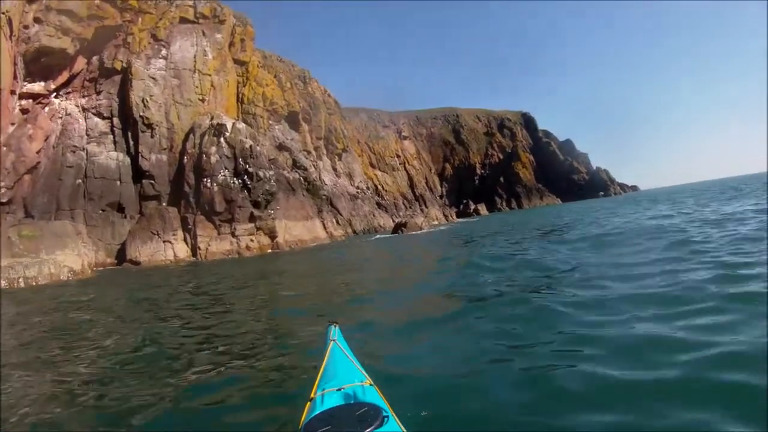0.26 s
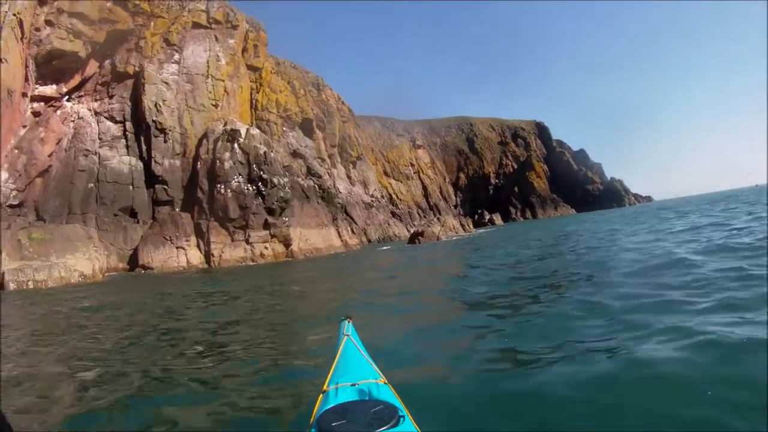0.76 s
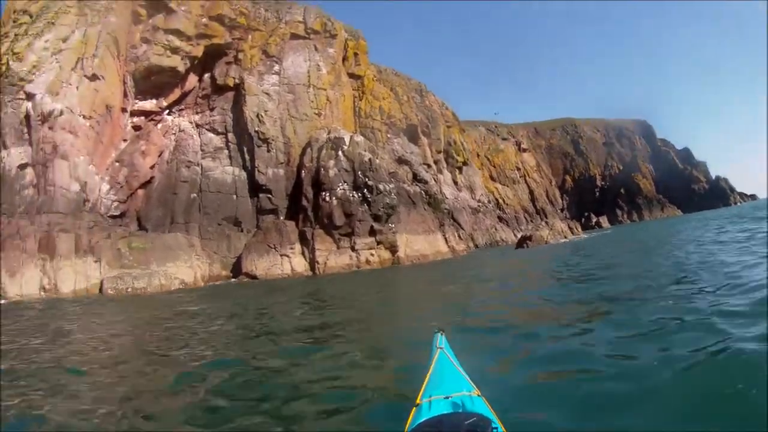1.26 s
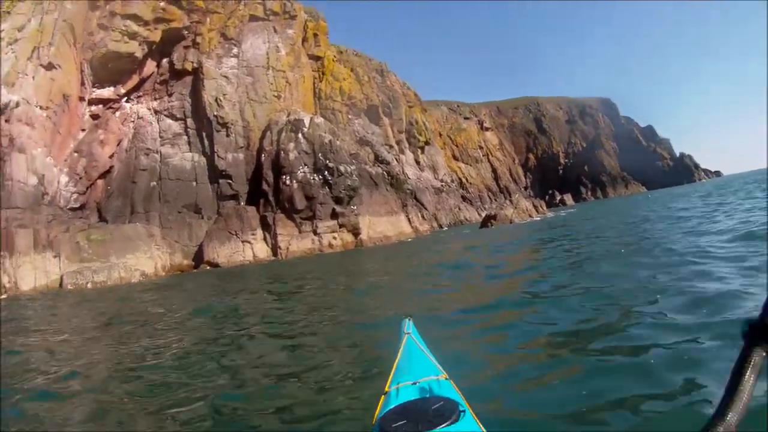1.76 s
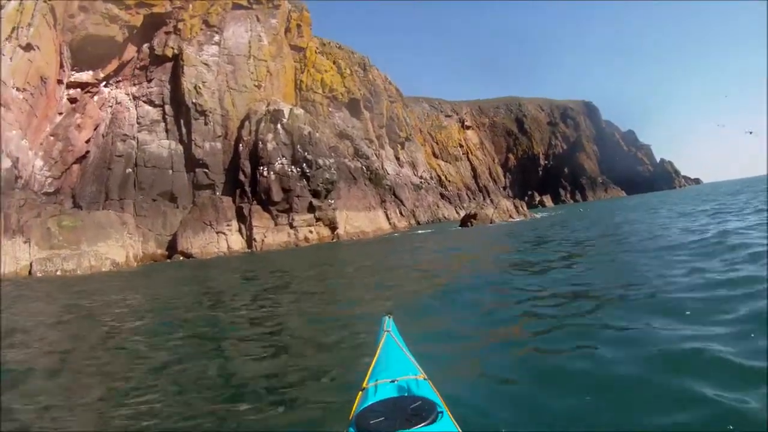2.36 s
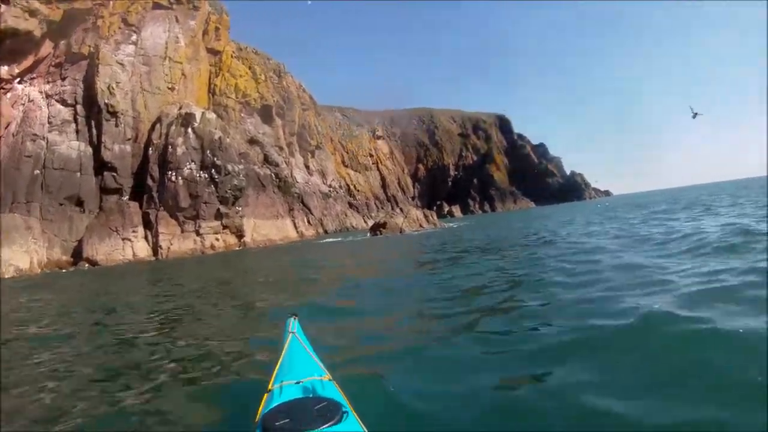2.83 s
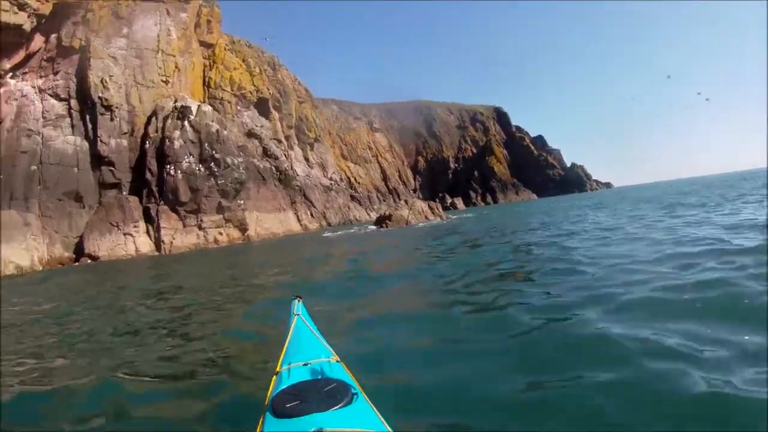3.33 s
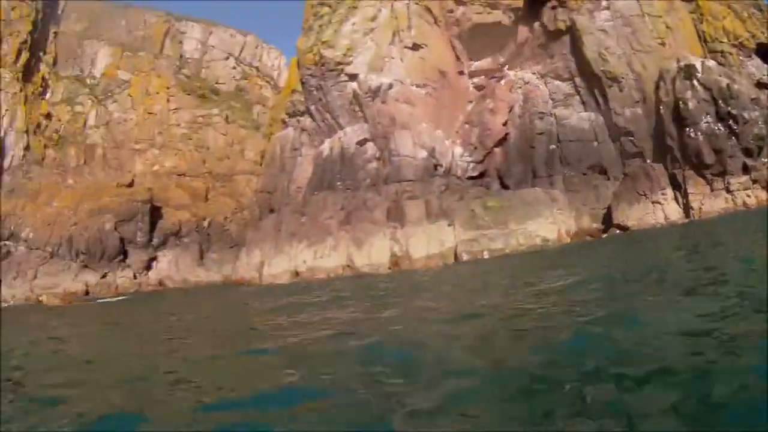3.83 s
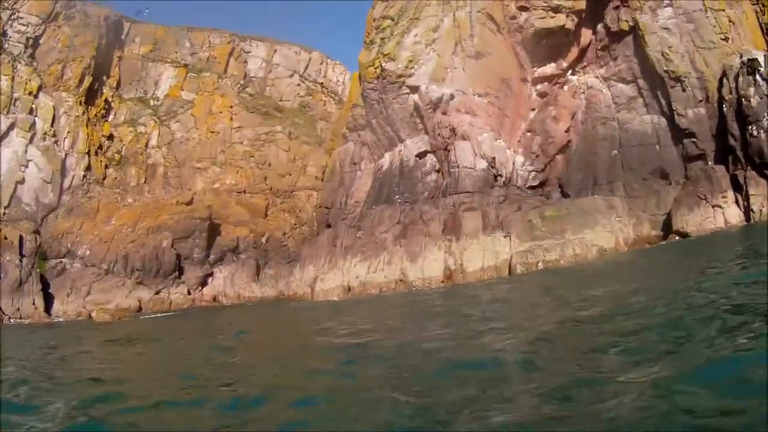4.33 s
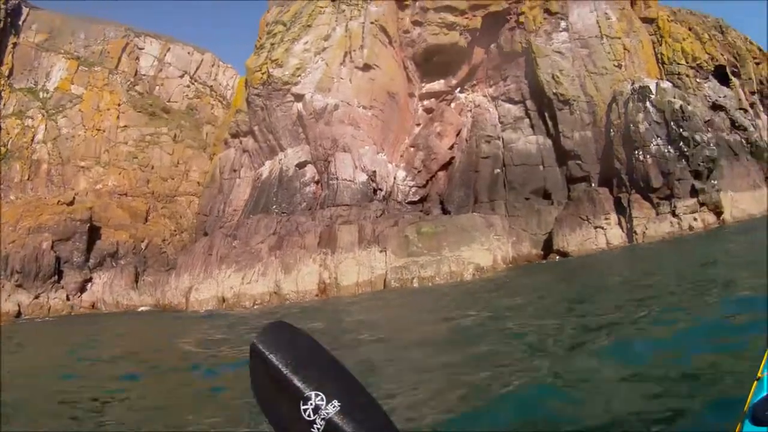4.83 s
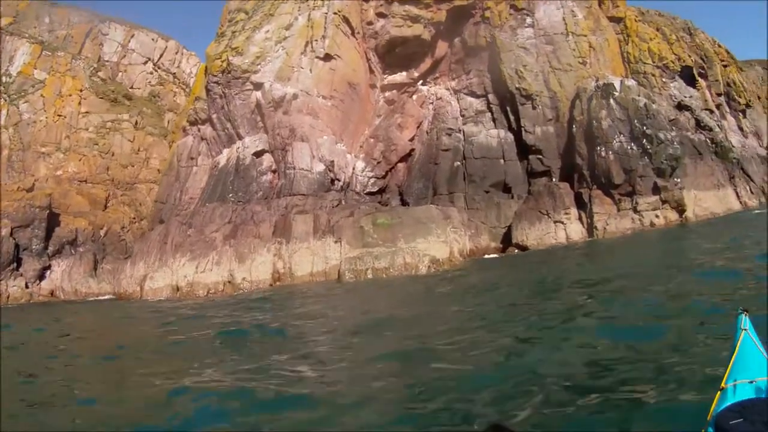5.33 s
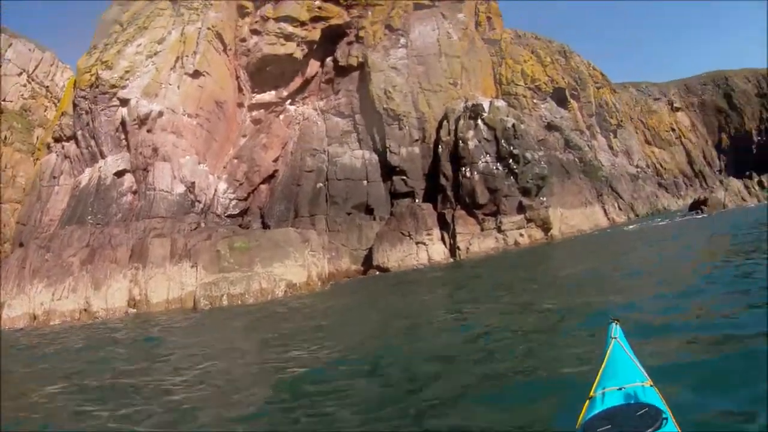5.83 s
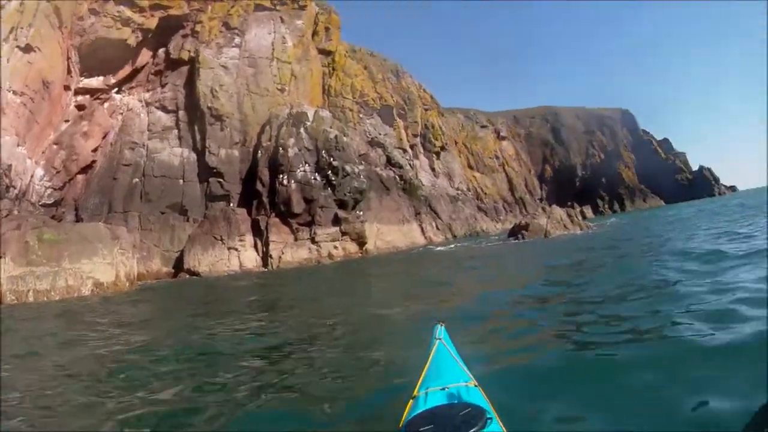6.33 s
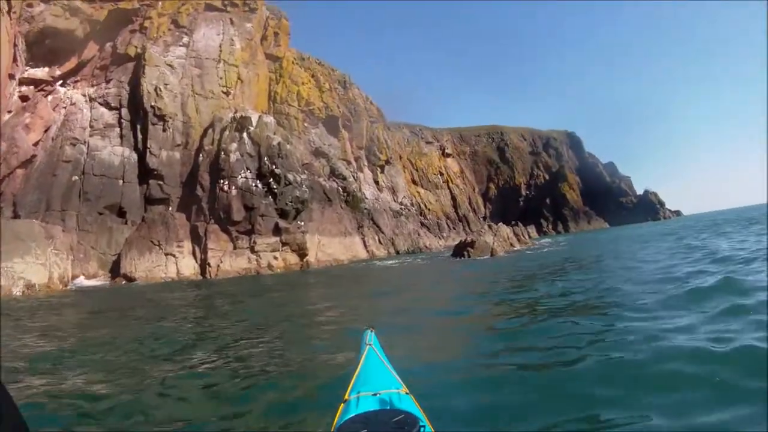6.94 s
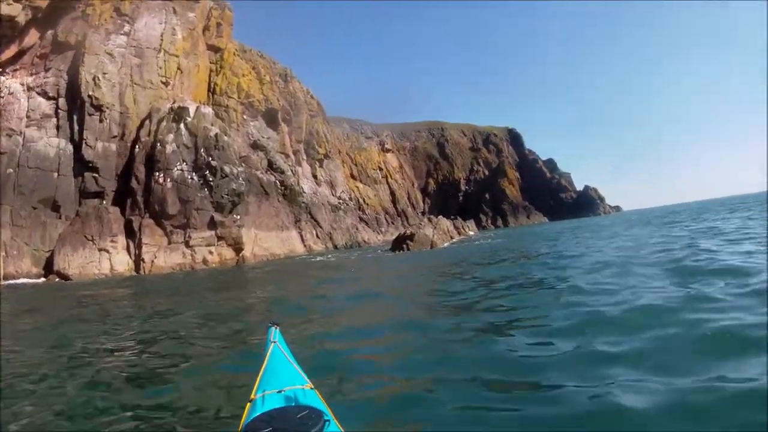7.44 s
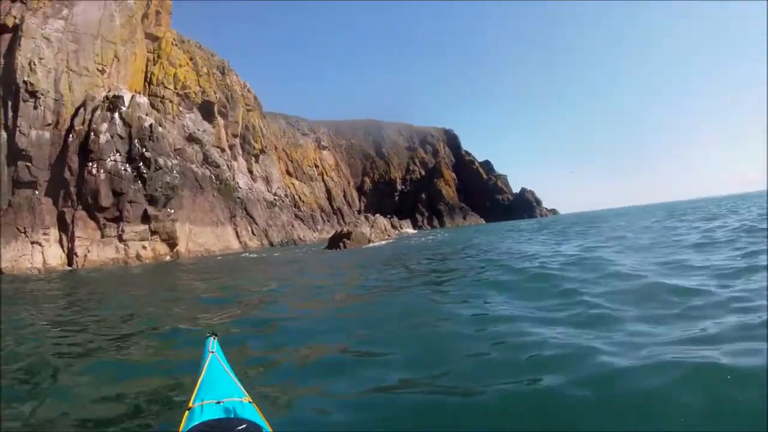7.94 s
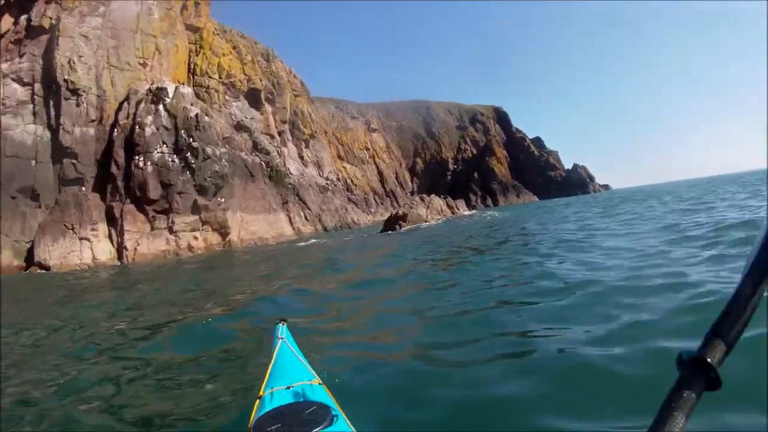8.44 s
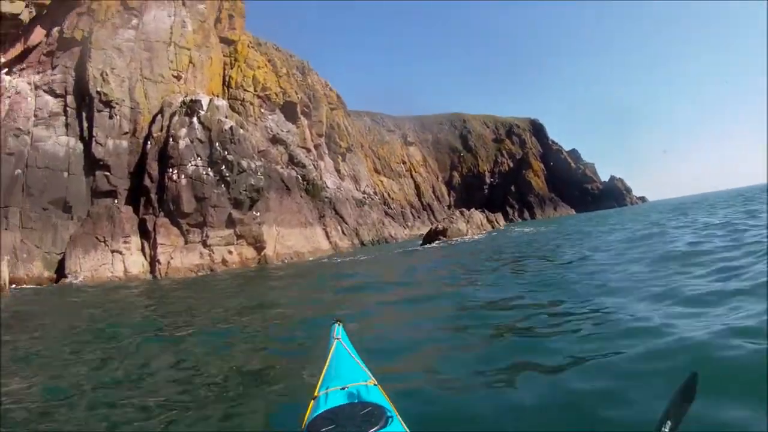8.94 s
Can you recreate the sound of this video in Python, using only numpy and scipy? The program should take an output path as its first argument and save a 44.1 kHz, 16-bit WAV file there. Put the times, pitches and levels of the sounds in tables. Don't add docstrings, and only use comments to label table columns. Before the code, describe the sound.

A steady, muted wash of swell with fine foam fizz lasts the whole nine seconds or so, close to the water beneath rocky cliffs. A low wind bump opens it, with scattered drips and tiny gurgles. At about 0.8 seconds a gull begins faintly; from 1.8 it repeats a fast three-note call roughly every 0.4 seconds: rising lead-in, drooping high note, fuller lower note. It grows louder and brighter by 4 to 5 seconds and continues, slightly slurred after 7.4, to about 9. Shorter, higher cries answer from afar, densest from 3 to 7, with a faint colony behind and short rock echoes. Soft splashes come near 1.8, 3.7 and 4.5, a sharp drop at 4.5, stronger splashes around 5.9 to 6.5, then a crisp burst of splashes and ticks at 8.4 to 8.7. Low wind puffs nudge the housed microphone near 1.4, 2.2, 4.9 and 7.3.

```python
import sys
import numpy as np
from scipy import signal
from scipy.fft import rfft, irfft, next_fast_len
from scipy.io import wavfile
from scipy.ndimage import uniform_filter1d

SR = 44100
rng = np.random.default_rng(int(sys.argv[2]) if len(sys.argv) > 2 else 0)


def gain_from_db(level_db):
    decades = np.asarray(level_db, float) / 20
    return 10 ** decades


def persist_wave(psi):
    counts = np.round(np.clip(psi, -1, 1) * 32767).astype(np.int16)
    wavfile.write(sys.argv[1], SR, np.atleast_2d(counts).T)


N = 405279


def evened(x):
    return x / np.sqrt(np.mean(x ** 2) + 1e-20)


def curve(table, column):
    rows = np.array(table)
    return np.interp(np.arange(N) / SR, rows[:, 0], rows[:, column])


def coloured(x, points):
    hz, db = np.transpose(points)
    size = next_fast_len(len(x))
    bins = np.fft.rfftfreq(size, 1 / SR)
    gain = gain_from_db(np.interp(np.log(bins + 1), np.log(hz), db))
    return irfft(rfft(x, size) * gain, size)[:len(x)]


def wander(seconds):
    width = max(round(seconds * SR), 1)
    smooth = uniform_filter1d(rng.standard_normal(N), width)
    return evened(uniform_filter1d(smooth, width))


def add(mix, s, sound):
    part = mix[round(s * SR):][:len(sound)]
    part += sound[:len(part)]


def bursts(rows, rest_db):
    t = np.arange(N) / SR
    power = gain_from_db(rest_db) ** 2
    for s, rise, fall, db in rows:
        away = np.where(t < s, (s - t) / rise, (t - s) / fall)
        power = power + gain_from_db(db) ** 2 * np.exp(-away ** 2)
    return np.sqrt(power)


def glides(rows, partials_db, rise_s, fall_s, fade_db, tilt, waver, flutter_db, slur=0, bend=4):
    slurs_from_s, slur_s = 7.4, 0.01377
    out = np.zeros(N)
    tremble, flutter = wander(0.0035), wander(0.0091)
    order = np.arange(1, len(partials_db) + 1)[:, None]
    for s, length, first_hz, last_hz, even, db in rows:
        at = round(s * SR)
        t = np.arange(min(round(length * SR), N - at)) / SR
        u = t / length
        hz = first_hz + (last_hz - first_hz) * (even * u + (1 - even) * u ** bend)
        hz *= 1 + slur * (s > slurs_from_s) * np.exp(-t / slur_s)
        phase = 2 * np.pi * np.cumsum(hz * (1 + waver * tremble[at:at + len(t)])) / SR
        weights = gain_from_db(np.reshape(partials_db, (-1, 1)) + tilt[at] * np.log2(order / 8.8))
        shape = np.minimum(t / rise_s, 1) * np.clip((length - t) / fall_s, 0, 1)
        shape *= gain_from_db(-fade_db * (u - 1.0))
        beats = flutter[(at + np.arange(len(t)) + order * SR) % N]
        partials = weights * gain_from_db(flutter_db * beats) * np.sin(order * phase)
        add(out, s, np.sqrt(2) * gain_from_db(db) * partials.sum(0) * shape)
    return out


# start_s, lead_in_s, length_s, pitch_hz, level_db
SECOND_NOTES = [(0.843, .015, 0.05, 1710, -52), (1.403, 0.048, 0.07, 1695, -53.5),
                (1.83, .026, 0.073, 1680, -53.5), (2.24, 0.021, 0.078, 1643, -49),
                (2.667, 0.026, 0.078, 1655, -50), (3.087, 0.025, 0.08, 1655, -48.5),
                (3.519, 0.024, 0.088, 1663, -44.5), (3.921, 0.028, 0.072, 1668, -47),
                (4.309, 0.033, 0.071, 1650, -44.5), (4.672, 0.029, 0.091, 1664, -44.5),
                (5.06, 0.033, 0.073, 1669, -42), (5.429, 0.034, 0.074, 1657, -43.5),
                (5.834, .02, .096, 1665, -46.5), (6.316, 0.041, 0.093, 1645, -44),
                (6.715, 0.032, 0.071, 1640, -43), (7.137, 0.052, 0.04, 1630, -44),
                (8.442, 0.008, 0.0516, 1677, -44), (9.142, 0.034, 0.14, 1558, -46)]
# start_s, length_s, level_db
ARCHED_NOTES = [
    (7.442, 0.081, -46.5),
    (7.765, 0.077, -47.5),
    (8.088, .066, -45.5),
    (8.75, 0.08, -46.5),
]
# start_s, length_s, pitch_hz, level_db, droop (share of pitch)
THIRD_NOTES = [(1.906, 0.056, 1255, -49.5, 0.067), (2.307, 0.089, 1241, -45, .1),
               (2.777, .078, 1244, -44, .1), (3.164, 0.108, 1246, -43, .08), (3.603, 0.11, 1252, -40, .12),
               (3.994, 0.094, 1255, -40.5, 0.094), (4.375, 0.089, 1264, -36, .11),
               (4.755, 0.094, 1255, -39, .12), (5.127, 0.084, 1257, -38, .11),
               (5.515, 0.082, 1260, -39, .13), (5.917, 0.112, 1258, -39.5, 0.15),
               (6.388, 0.1, 1246, -38.5, 0.14), (6.802, 0.08, 1241, -37.5, 0.16),
               (7.178, .09, 1234, -37, 0.148), (7.512, 0.096, 1234, -36, .15),
               (7.83, 0.097, 1232, -36.5, 0.142), (8.149, 0.092, 1217, -36.5, .13),
               (8.489, 0.085, 1231, -37, 0.12), (8.812, 0.098, 1199, -39, 0.062),
               (8.883, 0.09, 1267, -44, 0.11)]
FIRST_PARTIALS = [-2.5, 0, -2, -4.5, -29, -37]
SECOND_PARTIALS = [-7.5, -3.5, -9, -29, -39, -48]
THIRD_PARTIALS = [-14.5, -12, -5.5, -5, -17.5, -42.5]
# time_s, tilt_db_per_octave
FACING_BOAT = [
    (0, -2),
    (2.3, -2.5),
    (3.3, -1),
    (4, 0.5),
    (5, 0),
    (6.2, -1),
    (7, -0.5),
    (7.6, 0),
    (8.4, 0),
    (9.2, 0),
]


def near_bird():
    lead_from, lead_to, lead_db = .805, .88, -4
    overlap_s = 0.0023
    high_droop = 0.1405
    facing = curve(FACING_BOAT, 1)
    first = [(s - lead, lead + overlap_s, lead_from * hz, lead_to * hz, 1.11, db + lead_db)
             for s, lead, _, hz, db in SECOND_NOTES]
    first += [(s, length, 1368, 1292, -0.23, db) for s, length, db in ARCHED_NOTES]
    second = [(s, length, hz, hz * (1 - high_droop), 0.221, db) for s, _, length, hz, db in SECOND_NOTES]
    third = [(s, length, hz, hz * (1 - droop), 0.1, db) for s, length, hz, db, droop in THIRD_NOTES]
    call = glides(first, FIRST_PARTIALS, 0.0031, 0.0032, 1, facing, 0.0038, 0.92, slur=-0.052)
    call += glides(second, SECOND_PARTIALS, 0.0017, 0.019, 4.5, facing, 0.003, 1.6)
    call += glides(third, THIRD_PARTIALS, 0.0076, 0.014, 0.36, facing, 0.0019, 1.25, slur=0.0506, bend=5.46)
    return call


# start_s, length_s, first_hz, last_hz, level_db
CLIMBING_NOTES = [(2.805, .045, 3950, 4180, -56), (2.78, .1, 1215, 1370, -48.5),
                  (3.305, .053, 3680, 4220, -52.5), (3.791, .075, 3710, 4280, -50),
                  (4.33, .06, 1390, 1510, -48), (4.442, .056, 4030, 4265, -48.5),
                  (4.998, .04, 3990, 4410, -48), (5.247, .073, 3770, 3960, -54.5),
                  (5.456, .112, 1180, 1250, -46.5), (5.722, .035, 3930, 4240, -47),
                  (6.448, .055, 4080, 4260, -48.5), (7.981, .08, 1385, 1430, -43.5),
                  (7.087, .089, 4045, 4215, -51.5), (5.756, .034, 3905, 4065, -50.5),
                  (5.719, .017, 5810, 6110, -51.5), (4.013, .034, 5910, 6840, -57.5),
                  (6.161, .029, 3710, 3860, -49), (2.84, .035, 6100, 6150, -57)]
# start_s, length_s, pitch_hz, level_db
PLUNGING_NOTES = [(2.85, 0.045, 4800, -57), (3.36, 0.053, 4130, -49), (5.997, 0.043, 8950, -62),
                  (6.012, 0.035, 5950, -48), (4.357, 0.069, 1512, -47), (4.506, 0.045, 4280, -45.5),
                  (8.0, .05, 5750, -55), (8.12, .075, 5750, -54), (4.69, .065, 6650, -59),
                  (4.33, .06, 6600, -58), (5.038, 0.071, 4845, -47), (3.35, .06, 4780, -52),
                  (3.606, 0.1, 6760, -54), (3.626, 0.095, 5800, -50), (5.27, 0.066, 5440, -55),
                  (5.455, .07, 6630, -65), (5.756, 0.074, 4800, -49.5), (6.002, .05, 6770, -54),
                  (6.5, .066, 4110, -44.5), (6.663, .1, 1259, -48.5), (7.17, 0.055, 4760, -44),
                  (7.242, 0.072, 5700, -47.5), (7.262, .045, 6400, -51.7), (5.997, 0.051, 8250, -58),
                  (8.868, 0.1, 6970, -56)]
# start_s, length_s, pitch_hz, level_db
SLIDING_NOTES = [(0.102, 0.034, 1450, -48), (0.13, .03, 1660, -52), (1.067, .024, 1660, -48),
                 (0.92, 0.054, 3620, -59), (1.465, 0.021, 2910, -46), (2.699, 0.08, 1590, -48.5),
                 (2.72, .05, 3080, -55), (2.887, .028, 3950, -52), (3.12, .045, 6500, -58),
                 (2.914, .053, 5320, -52), (3.424, .057, 5240, -53), (3.86, 0.051, 4150, -52.1),
                 (5.485, 0.062, 5950, -52), (6.23, 0.07, 5500, -49), (6.235, 0.082, 3624, -39),
                 (3.406, .022, 3620, -52), (8.412, 0.035, 2850, -47), (8.89, 0.067, 5130, -48),
                 (8.9, .055, 3500, -51), (8.9, .05, 8700, -68), (7.534, 0.052, 1436, -53),
                 (0.154, .017, 1130, -52), (5.475, .03, 5300, -55), (3.573, 0.038, 6300, -56),
                 (3.679, 0.037, 1600, -48), (6.736, 0.054, 6460, -52), (8.144, 0.047, 6350, -54),
                 (8.564, 0.032, 5200, -46), (8.874, 0.09, 1743, -45), (8.916, 0.07, 5770, -47)]


def answering_birds():
    plunge, slide_per_s = .12, 1.1
    rows = [(s, length, hz, last_hz, 1.5, db) for s, length, hz, last_hz, db in CLIMBING_NOTES]
    rows += [(s, length, hz, hz * (1 - plunge), 0.223, db) for s, length, hz, db in PLUNGING_NOTES]
    rows += [(s, length, hz, hz * (1 - slide_per_s * length), 1.5, db) for s, length, hz, db in SLIDING_NOTES]
    return glides(rows, [.5], .008, .012, 0, np.zeros(N), .003, 2.6)


def colony():
    draw = rng.random((110, 4))
    start_s = draw[:, 0] * (N / SR - .2)
    length_s = 0.0424 + 0.0636 * draw[:, 2]
    hz = 1150 + 650 * draw[:, 1]
    level_db = -60 - 8 * draw[:, 3]
    rows = np.array([start_s, length_s, hz, .9 * hz, 0.317 + 0 * hz, level_db])
    return glides(rows.T, [0.0, -5.5, -22, -19], 0.025, 0.021, 0, np.zeros(N), 0.0068, 2.4)


# delay_s, level_db
ROCK_FACES = [
    (0.109, -19.5),
    (0.145, -18.5),
    (.29, -17.5),
]


def cliff(x):
    t = np.arange(SR) / SR
    taps = rng.choice([-1., 1.], SR) * (rng.random(SR) < 1500 / SR)
    tail = taps * (t > .03) * gain_from_db(-60 * t / 1.2)
    echo = gain_from_db(-11) * evened(tail) / np.sqrt(SR)
    for delay, db in ROCK_FACES:
        smear = taps * np.exp(-((t - delay) / 0.0058) ** 2)
        echo += gain_from_db(db) * evened(smear) / np.sqrt(SR)
    return signal.oaconvolve(x, echo)[:N]


# peak_s, rise_s, fall_s, level_db
PADDLE_SPLASHES = [(1.37, 0.04, 0.23, -54), (1.75, 0.045, 0.066, -46), (2.23, .02, 0.09, -51),
                   (3.65, 0.056, 0.065, -48.5), (4.45, 0.095, .05, -49), (5.93, 0.034, 0.091, -39),
                   (6.17, 0.028, 0.046, -44.5), (6.42, 0.23, 0.19, -46), (7.25, 0.068, 0.11, -46.5),
                   (8.415, 0.0094, 0.08, -41.5), (8.52, 0.026, 0.084, -41.5), (8.68, 0.017, 0.081, -41.5),
                   (9.1, 0.2, 0.12, -48)]
# freq_hz, level_db
HOUSING_TONE = [(300, -22), (1000, -1.5), (4000, -0.5), (6200, 3), (7500, -6), (10000, -13.5),
                (15000, -24.5)]


def spray():
    t, out, clumps = np.arange(300) / SR, np.zeros(N), wander(0.0089)
    size = gain_from_db(3.8 * np.minimum(rng.exponential(1, N), 4) + 3 * np.clip(clumps, -2, 2))
    size *= rng.random(N) < 2600 / SR
    kind = rng.integers(0, 24, N)
    for k, hz in enumerate(np.geomspace(700, 14500, 24)):
        ring = np.sin(2 * np.pi * hz * t * (1 + 0.0436 * hz * t))
        grain = ring * np.exp(-t * hz / 3.7) * np.sqrt(hz)
        out += signal.oaconvolve(size * (kind == k), grain)[:N]
    sheet = rng.standard_normal(N) * gain_from_db(2.7 * clumps)
    ticks = evened(size * rng.choice([-1., 1.], N) * (kind < 5))
    out += 0.66 * ticks * np.std(out)
    wet = coloured(evened(out) + .45 * sheet, HOUSING_TONE)
    wet = coloured(wet, [(500, 2.5), (2000, 5.5), (6000, 3.0), (14000, 0.5)])
    return bursts(PADDLE_SPLASHES, -56.0) * evened(wet)


# start_s, peak_db,
# pitch_hz
PADDLE_DROPS = [(0.2428, -37, 6430), (0.406, -35.5, 5530), (0.8067, -32.5, 5930), (1.3377, -29.5, 5700),
                (1.3768, -30, 5770), (1.565, -33, 5600), (1.603, -37, 5600), (2.3151, -39, 5570),
                (2.326, -29.5, 5800), (4.412, -32, 5710), (4.4831, -23.5, 5600), (5.838, -37, 6340),
                (5.854, -33, 5860), (6.1546, -37, 5800), (6.1714, -27, 4150), (6.439, -30, 5900),
                (6.4928, -27.5, 6440), (6.5223, -33, 5690), (7.0888, -28, 5450), (7.1796, -45, 6050),
                (7.196, -34, 6500), (7.227, -45, 7000), (7.7132, -33, 5700), (8.4093, -29, 5750),
                (8.4497, -33, 6300), (8.668, -28, 5260), (8.7014, -31, 5600), (9.151, -33, 5430),
                (1.5643, -37, 2100), (1.7667, -37, 1930), (1.9764, -38, 2100), (2.078, -34, 3320),
               (2.2124, -39, 2750), (2.2957, -47, 2580), (2.9412, -35, 2760), (3.307, -36.5, 2650),
               (0.178, -36.5, 2900), (0.369, -37, 3250), (0.44, -42, 4000), (0.472, -42, 3950),
               (0.527, -41, 3250), (0.62, -40, 2000), (0.687, -43, 2400), (4.482, -37, 2050),
               (6.171, -34, 2400), (6.154, -37, 2300), (6.262, -36, 1900), (6.197, -40, 3200),
               (8.523, -34, 2410), (8.734, -32, 4800), (4.44, -37, 5700), (1.338, -38, 3900),
               (2.575, -40, 5500), (1.546, -41, 2200), (2.297, -38, 3700), (4.562, -37, 4500),
               (5.658, -34, 4950), (6.597, -33, 4140), (6.8284, -29.5, 3540), (7.2394, -47, 3260),
               (8.5225, -26, 3670), (8.562, -35, 2580), (8.6682, -33, 1930), (8.6814, -49, 3180),
               (6.3265, -47, 9000), (6.4142, -38, 9080), (6.5434, -48, 10300), (6.6992, -49, 10700),
               (2.3083, -31.5, 2430), (2.31, -32.5, 1270), (6.414, -36, 2300), (6.39, -37, 2800),
               (6.537, -39, 2700), (8.42, -35, 3900), (5.95, -36, 1920), (5.988, -33, 3300)]


def drips():
    out, t = np.zeros(N), np.arange(400) / SR
    for s, db, hz in PADDLE_DROPS:
        walk = rng.standard_normal(len(t) + 1).cumsum()
        softened = np.diff(uniform_filter1d(walk, round(SR / hz / 2.5)))
        tick = 0.73 * evened(softened) * np.exp(-t * hz / 7.1)
        ring = np.sin(2 * np.pi * hz * t) * np.exp(-t * hz / 5.4)
        level_db = db + 1.5 - np.interp(hz, *np.transpose(HOUSING_TONE))
        add(out, s, gain_from_db(level_db) * (tick + ring))
    return coloured(out, HOUSING_TONE)


# start_s, life_s, pitch_hz, level_db
RISING_POCKETS = [(0.097, 0.021, 544, -54), (0.256, .027, 380, -59), (0.363, 0.01, 2110, -54),
                  (0.686, 0.0053, 1560, -40), (1.565, 0.027, 757, -42), (1.745, 0.032, 684, -58),
                  (1.996, .018, 1900, -52), (2.489, 0.033, 650, -59), (3.686, 0.055, 832, -56.5),
                  (4.015, 0.04, 324, -58.5), (4.032, .05, 838, -53.5), (4.935, 0.055, 399, -59),
                  (6.42, .06, 210, -59), (8.582, 0.059, 202, -63), (8.665, 0.024, 332, -58.5),
                  (8.9, 0.062, 223, -63)]
# start_s, life_s, pitch_hz, level_db
BURSTING_POCKETS = [(0.619, .006, 1920, -54), (0.789, .007, 1680, -50.5), (.768, .008, 1100, -52),
                    (2.738, .006, 1800, -49), (3.126, .007, 1850, -49), (4.482, .012, 450, -53),
                    (4.395, .02, 340, -59), (5.285, .02, 290, -59), (1.729, 0.0078, 2980, -42.5),
                    (2.307, 0.016, 794, -46), (2.467, 0.0087, 860, -50.5), (3.066, 0.012, 1130, -46.5),
                    (3.571, 0.036, 650, -59), (5.933, 0.016, 1020, -46), (5.983, 0.011, 666, -49.5),
                    (5.996, 0.057, 337, -61), (6.974, 0.0081, 1350, -46.5), (8.689, .027, 934, -58),
                    (8.994, .014, 1120, -51)]


def bubbles():
    rows = [(s, life, hz, 1.5 * hz + 281, 0.688, db) for s, life, hz, db in RISING_POCKETS]
    rows += [(s, life, hz, 1.23 * hz, .25, db) for s, life, hz, db in BURSTING_POCKETS]
    return glides(rows, [0], 0.00056, 0.00073, 10.1, np.zeros(N), 0.0022, 0.8)


# start_s, peak_db
BLADE_FLECKS = [(0.1765, -51), (0.1894, -54), (0.5496, -47), (0.9113, -50), (0.9832, -50), (1.1328, -40),
                (1.1657, -46), (1.1832, -45), (1.288, -50), (1.4406, -48), (1.5329, -50), (1.6871, -50),
                (1.7045, -46), (1.7908, -50), (1.9111, -49), (1.9624, -44), (2.0792, -50), (2.2139, -47),
                (2.3416, -47), (2.6334, -50), (3.2844, -44), (4.3809, -45), (4.4294, -49), (4.4792, -43),
                (4.5032, -46), (4.5144, -53), (5.692, -48), (5.9015, -46), (5.9224, -40), (6.0836, -44),
                (6.1689, -42), (6.2497, -46), (6.2946, -49), (6.4662, -48), (6.5645, -49), (6.5909, -45),
                (6.6109, -47), (6.8294, -40), (7.3223, -51), (7.7004, -40), (7.9982, -48), (8.2452, -46),
                (8.323, -41), (8.3948, -46), (8.4103, -41), (8.4602, -45), (8.5225, -41), (8.5609, -39),
                (8.6754, -37), (8.6824, -36), (8.7294, -43), (9.0179, -49), (9.0518, -47), (9.1137, -36)]
# freq_hz, level_db
FLECK_COLOUR = [(1500, -30), (4500, -8), (7000, 5), (10000, 1), (15000, -9)]


def flecks():
    out, t = np.zeros(N), np.arange(200) / SR
    grains = rng.standard_normal((len(BLADE_FLECKS), len(t)))
    for (s, db), grain in zip(BLADE_FLECKS, grains):
        tick = grain * np.exp(-t / .0004)
        add(out, s, gain_from_db(db + 2) * tick / abs(tick).max())
    return coloured(out, FLECK_COLOUR)


# time_s, level_db
SWELL = [
    (0.0, -49),
    (4.86, -49.5),
    (9.19, -48.5),
]
# freq_hz, level_db_per_hz
SEA_COLOUR = [(76, -27), (130, -13.5), (232, -6.5), (631, -0.5), (1380, -1), (2270, -4.5), (4960, -5),
              (6050, -8.5), (9210, -28), (14600, -34.5), (15500, -43)]


def sea():
    frames = N // 128 + 5
    a, b, patches = rng.standard_normal((frames, 257, 3)).T
    patches = uniform_filter1d(patches, 6, 0)
    patches = evened(uniform_filter1d(patches, 10, 1))
    spectrum = (a + 1j * b) * gain_from_db(3.0 * patches)
    wash = evened(signal.istft(spectrum, nperseg=512, noverlap=384)[1][:N])
    pops = gain_from_db(2.2 * np.minimum(rng.exponential(1, N), 5)) * rng.standard_normal(N)
    fizz = evened(pops * (rng.random(N) < 1500 / SR))
    return gain_from_db(curve(SWELL, 1) + 2) * evened(coloured(wash + 0.6 * fizz, SEA_COLOUR))


# peak_s, rise_s, fall_s, level_db
WIND_PUFFS = [(0, .01, 0.055, -52.5), (.3, 0.084, 0.092, -68), (1.35, 0.056, 0.28, -53.5),
              (2.24, 0.13, 0.095, -56.5), (2.95, .03, 0.037, -62), (3.8, 0.22, 0.16, -64),
              (4.54, 0.045, 0.026, -63), (4.93, 0.12, 0.09, -52), (5.27, .1, 0.11, -60),
              (6.95, .03, .04, -66), (6.66, 0.069, 0.047, -64), (7.34, 0.025, 0.055, -57),
              (8.58, 0.075, .12, -72)]


def wind():
    puffs = rng.standard_normal(N) * gain_from_db(2.2 * wander(.02))
    colour = [(8, -29), (25, 4.5), (70, 0.5), (130, -8), (300, -20), (900, -70)]  # (Hz, dB)
    return bursts(WIND_PUFFS, -75.0) * evened(coloured(puffs, colour))


def scene():
    birds = near_bird() + answering_birds() + colony()
    paddle = spray() + drips() + bubbles() + flecks()
    return np.tile(birds + cliff(birds) + paddle + sea() + wind(), (2, 1))


def top_cut(x):
    return signal.sosfilt(signal.butter(12, 15700, fs=SR, output="sos"), x)


def record(dry):
    left = dry[0] - .00204
    right = signal.lfilter(*signal.butter(1, 125, "high", fs=SR), dry[1])
    hiss = gain_from_db(-76) * np.diff(rng.standard_normal((2, N + 1)))
    treble_limit = signal.firwin(511, 15230, fs=SR)[None]
    mix = signal.oaconvolve(np.array([left, right]) + hiss, treble_limit, "same")
    return top_cut(mix)


dry = scene()
out = record(dry)
persist_wave(out)
```